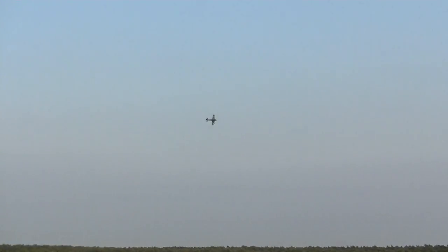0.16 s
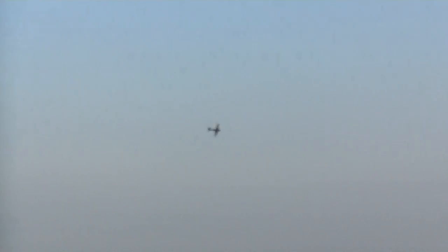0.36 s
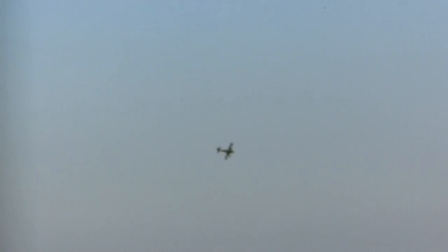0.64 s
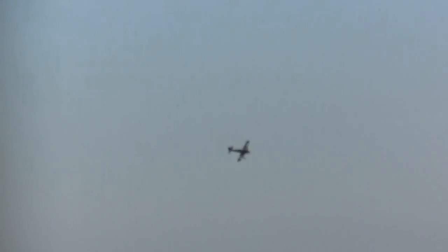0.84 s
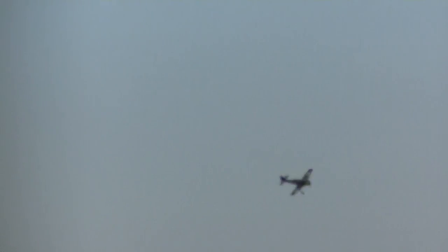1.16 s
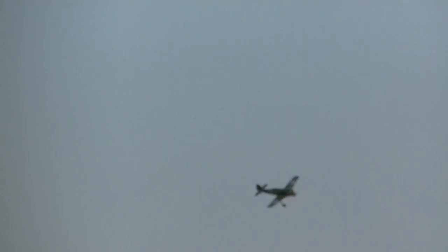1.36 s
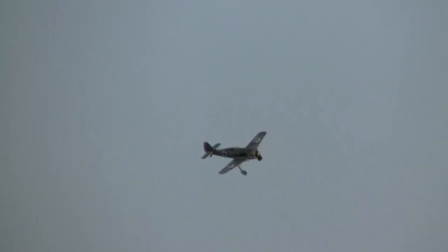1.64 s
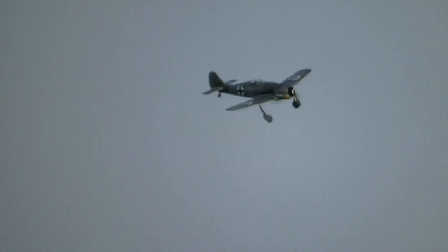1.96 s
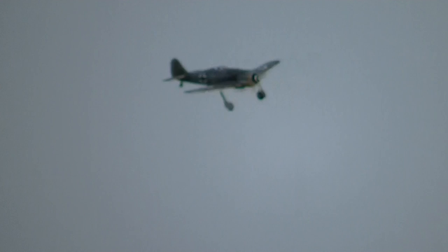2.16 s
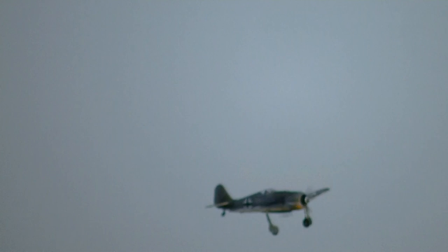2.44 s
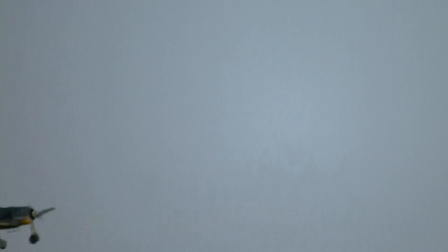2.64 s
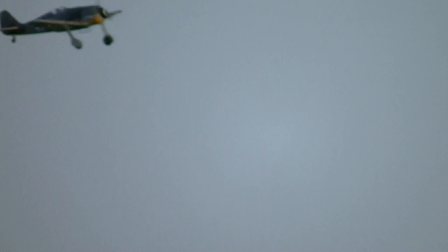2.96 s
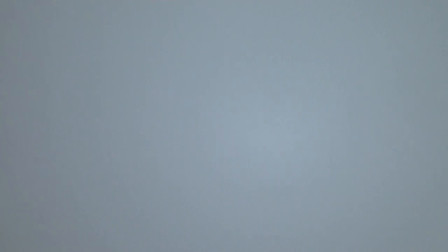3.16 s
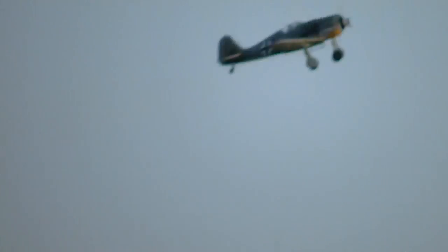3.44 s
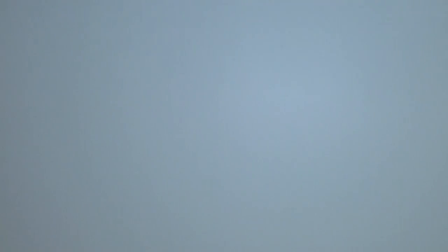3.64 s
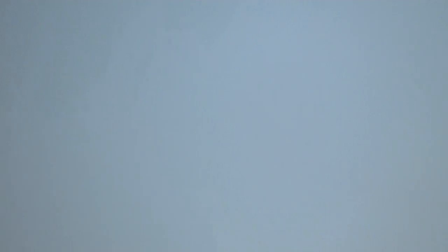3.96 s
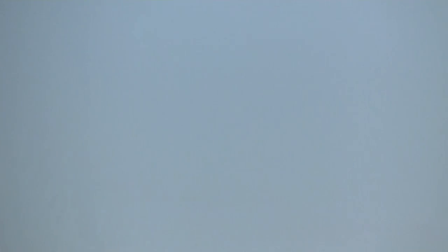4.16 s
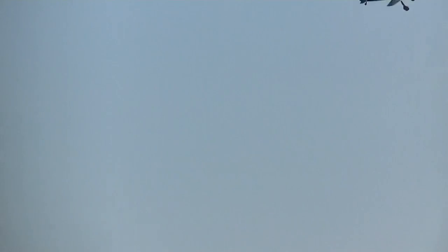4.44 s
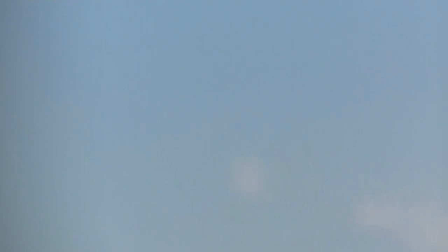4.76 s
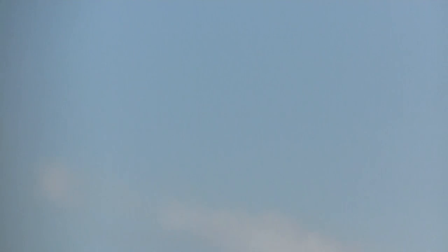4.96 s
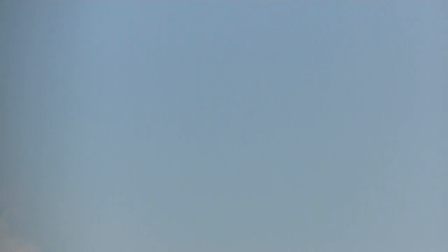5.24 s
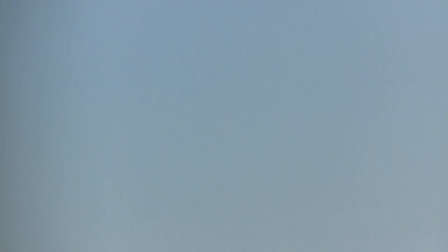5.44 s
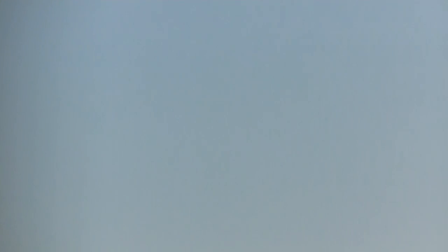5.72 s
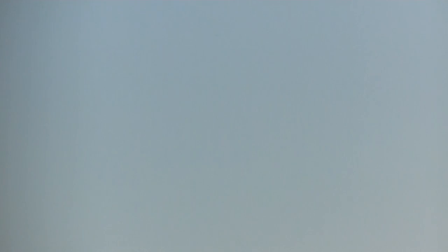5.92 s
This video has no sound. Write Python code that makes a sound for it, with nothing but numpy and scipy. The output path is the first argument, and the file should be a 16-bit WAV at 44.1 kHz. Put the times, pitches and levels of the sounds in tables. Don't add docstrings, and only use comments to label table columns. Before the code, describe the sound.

Outdoors, a steady high electric whine with buzzing propeller tones swells and fades as a model plane passes, wrapped in breathy air noise. Close to the microphone, skin scrapes the plastic case and two hard dry clicks stand out far above the distant plane. Low wind puffs bump the microphone midway and near the end, while airy howls colour the last second and the whine grows stronger.

```python
import sys
import numpy as np
from scipy import signal
from scipy.io import wavfile
from scipy.ndimage import uniform_filter1d, map_coordinates

SR = 44100
rng = np.random.default_rng(int(sys.argv[2]) if len(sys.argv) > 2 else 0)


def output_pcm(signal):
    pcm = np.clip(np.atleast_2d(signal).T, -1, 1) * 32767
    wavfile.write(sys.argv[1], SR, np.round(pcm).astype(np.int16))


def level_to_linear(level):
    exponent = np.asarray(level, float) / 20
    return 10 ** exponent


N = 268466


def evened(x):
    return x / np.sqrt(np.mean(x ** 2) + 1e-20)


def read(points, hz):
    f, value = np.transpose(points)
    return np.interp(np.log(hz + 1), np.log(f + 1), value)


def curves(rows):
    s, *columns = np.transpose(rows)
    return [np.interp(np.arange(N) / SR, s, c) for c in columns]


def swells(steady_db, rows):
    t = np.arange(0, N + 64, 64) / SR
    level = level_to_linear(steady_db)
    level = level + sum(level_to_linear(db) * np.exp(-((t - s) / half_s) ** 2) for s, half_s, db in rows)
    return np.interp(np.arange(N) / SR, t, 20 * np.log10(level))


def panned(x, pan_db):
    left, right = np.broadcast_to(x, (2, x.shape[-1]))
    return np.array([left * level_to_linear(pan_db / 2), right * level_to_linear(-pan_db / 2)])


def add(mix, s, sound):
    part = mix[:, round(s * SR):][:, :sound.shape[1]]
    part += sound[:, :part.shape[1]]


def patches(frames, bins, patchy_db):
    spots = uniform_filter1d(rng.standard_normal((frames, bins)), size=24, axis=0)
    spots = uniform_filter1d(spots, size=10, axis=1)
    return level_to_linear(patchy_db * evened(spots).T)


# time in seconds, shaft speed as heard in Hz, switching tone of the speed controller in Hz.
SPEED_HZ = [(0.0, 134.36, 7666), (0.15, 134.61, 7682), (0.3, 135.3, 7711), (0.75, 137.0, 7792),
            (1.35, 139.35, 7882), (1.65, 140.36, 7922), (2.1, 141.21, 7963), (2.4, 141.18, 7964),
            (2.7, 141.42, 7959), (3.0, 141.2, 7947), (3.6, 139.74, 7873), (4.05, 138.27, 7835),
            (4.35, 138.08, 7821), (4.65, 137.17, 7800), (4.95, 136.75, 7791), (5.4, 137.36, 7789),
            (5.7, 136.98, 7764), (6.07, 134.94, 7707)]
# time in seconds, level in dB.
PULL_DB = [
    (0, -8),
    (1.12, -9),
    (1.3, -27),
    (1.335, 2.5),
    (6.09, 2),
]
PULL_FOLLOWS = [0.085, 0.048, 0.063, 0.56, 0.24]
MAGNET_ORDERS = [13, 14, 28, 42]
BLADE_ORDERS = [2, 3, 4, 5, 12, 21, 8]
MAGNET_DB = [-74.5, -62.5, -65.5, -76]
BLADE_DB = [-80.5, -71.5, -80.5, -75, -71, -81.5, -70.5]
# middle in seconds, half length in seconds,
# level in dB.
MAGNET_BEAMS = [
    [(.08, 0.2, -55.5), (.5, 0.2, -61), (1.3, 0.47, -58.5), (3.55, 0.3, -70), (4.3, 0.48, -56.5),
     (5.33, 0.57, -47.5)],
    [(.65, 0.15, -51), (1.4, 0.39, -53), (2.15, 0.46, -55.5), (3.0, 0.26, -71), (4.0, .25, -78),
     (4.65, 0.36, -58.5), (5.36, 0.28, -49.5), (5.9, 0.51, -65)],
    [(.28, 0.078, -62), (.95, 0.077, -67), (1.27, 0.18, -54), (2.45, 0.094, -61), (3.17, 0.27, -60),
     (3.59, 0.029, -71), (3.85, 0.37, -52.5), (4.55, 0.55, -58.5), (5.55, 0.4, -64), (6.0, 0.073, -65)],
    [(.25, 0.25, -50), (.75, 0.11, -54), (.92, 0.068, -64), (1.07, 0.039, -61), (1.5, 0.52, -58.5),
     (2.1, 0.68, -57.5), (3.0, 0.35, -59.5), (3.8, 0.4, -59.5), (4.7, 0.4, -61.5), (5.42, 0.16, -60.5),
     (5.92, 0.034, -67), (6.05, 0.045, -54)],
]
BLADE_BEAMS = [
    [(.5, 0.34, -75), (1.2, 0.35, -71.5), (1.8, 0.21, -69), (3.9, 0.43, -60.5), (4.7, 0.4, -64.5),
     (5.65, 0.55, -65.5)],
    [(0, 0.2, -65), (.65, 0.52, -68.5), (2.7, 0.13, -88), (5.4, 0.21, -69)],
    [(.3, 0.54, -69.5), (3.0, 0.3, -67), (3.65, 0.29, -64), (4.4, 0.43, -67.5), (5.7, 0.11, -57)],
    [(1.1, 0.39, -72), (2.6, .25, -77), (4.1, 0.59, -74), (5.35, 0.15, -64.5)],
    [(.8, .3, -69), (2.35, .3, -66), (3.3, 0.12, -65), (3.9, 0.16, -68), (4.8, 0.39, -61.5)],
    [(.15, 0.51, -59), (1.35, 0.43, -70), (3.9, 0.77, -68.5), (5.15, 0.57, -66)],
    [(0, 0.12, -60.5), (2.15, 0.23, -75)],
]
# middle in seconds, half length in seconds, level in dB.
SWITCH_BEAMS = [(.63, 0.11, -68), (1.5, 0.21, -70), (2.4, 0.073, -81), (2.8, 0.1, -65), (3.85, 0.64, -66.5),
                (4.62, 0.076, -62), (6.07, 0.13, -69)]
# shaft order, level in dB.
FAINT_ORDERS = [(6, -127), (11, -69.5), (16, -69), (27, -94), (41, -82)]


def tone(turn, db):
    slow = N // 64 + 1
    wander = evened(uniform_filter1d(rng.standard_normal((2, slow)), size=20))
    flicker, drift = uniform_filter1d(np.repeat(wander, 64, 1)[:, :N], size=128)
    grain = np.repeat(rng.standard_normal(slow), 64)[:N]
    buzz = 1 + 0.074 * evened(uniform_filter1d(grain, size=96))
    phase = 2 * np.pi * (turn + 0.019 * drift + rng.random())
    return np.sqrt(2) * level_to_linear(db + 1.08 * flicker) * buzz * np.cos(phase)


def motor():
    shaft_hz, switch_hz = curves(SPEED_HZ)
    shaft_turns, switch_turns = np.cumsum(shaft_hz) / SR, np.cumsum(switch_hz) / SR
    pull_db = curves(PULL_DB)[0]
    out = np.zeros(N)
    for order, follow, db, beams in zip(MAGNET_ORDERS, PULL_FOLLOWS, MAGNET_DB, MAGNET_BEAMS):
        out += tone(order * shaft_turns, follow * pull_db + swells(db, beams))
    for order, db, beams in zip(BLADE_ORDERS, BLADE_DB, BLADE_BEAMS):
        out += tone(order * shaft_turns, swells(db, beams))
    for order, db in FAINT_ORDERS:
        out += tone(round(order) * shaft_turns, db)
    return out + tone(switch_turns, PULL_FOLLOWS[-1] * pull_db + swells(-68, SWITCH_BEAMS))


# body roar, wing rush, blade swish, tip hiss. Centre in Hz, level in dB,
# dB per dB of facing.
RUSH_HZ = [1100, 2800, 4800, 10500]
RUSH_DB = [-55.5, -61.5, -56.5, -61]
RUSH_FOLLOWS = [0.12, 0.36, 0.22, 1.44]
# frequency in Hz, density in dB per Hz.
AIR_DB = [(150, -37), (300, -27), (500, -8.5), (900, -2), (1600, -3), (2300, -0.5), (3200, -10.5),
          (4600, -6.5), (6500, -13.5), (8500, -16.5), (12400, -22), (15500, -32.5)]
# time in seconds, level in dB.
FACING_DB = [(0, 2), (.2, -18), (.45, -19), (.75, -15), (1.1, -17), (1.25, -10), (1.7, -3), (1.85, 1),
             (2.3, 0.5), (2.6, -0.5), (3.1, 4), (3.5, 1.5), (4.0, 3), (4.5, 1), (4.85, 2), (5.3, -6.5),
             (5.7, 1.5), (6.09, 4)]
# middle in seconds, half length in seconds, level in dB, centre in Hz.
GUSTS = [(0.083, 0.031, -51, 2300), (0.638, 0.053, -59, 3700), (1.342, 0.08, -60, 4300),
         (1.58, 0.055, -63, 4000), (1.959, 0.21, -60, 1500), (2.292, 0.11, -59.5, 10000),
         (2.447, 0.033, -57, 9200), (2.763, 0.033, -64, 4530), (2.97, 0.019, -49, 900),
         (3.122, 0.039, -63, 7040), (3.38, 0.032, -68, 6490), (3.59, 0.04, -56, 900),
         (3.696, 0.07, -60.5, 8000), (4.236, 0.089, -58, 3000), (4.575, 0.18, -59.5, 3500),
         (4.948, 0.075, -52.5, 4500), (5.27, 0.14, -52, 5150), (5.432, 0.076, -52.5, 2970),
         (5.614, 0.069, -55, 900), (5.918, 0.36, -61.5, 2940)]


def rush():
    gust_octaves = 1.4
    chops, gusts_db = [0.039, 0.097, 0.17, 0.18], [0.2, 0.5, 0.7, 1.2]
    frames, hz = N // 128 + 5, np.fft.rfftfreq(512, 1 / SR)
    a, b = rng.standard_normal((frames, 257, 2)).T
    z = (a + 1j * b) * level_to_linear(read(AIR_DB, hz))[:, None] * patches(frames, 257, patchy_db=2.0)
    blade_phase = 2 * np.pi * 2 * np.cumsum(curves(SPEED_HZ)[0]) / SR
    gust = uniform_filter1d(rng.standard_normal(N), size=1500)
    gust = evened(uniform_filter1d(gust, size=900))
    facing_db = curves(FACING_DB)[0]
    out = np.zeros(N)
    for k, (chop, gust_db) in enumerate(zip(chops, gusts_db)):
        blown = [(s, half_s, db - 6 * (np.log2(f / RUSH_HZ[k]) / gust_octaves) ** 2)
                 for s, half_s, db, f in GUSTS]
        level = level_to_linear(RUSH_DB[k] + RUSH_FOLLOWS[k] * facing_db) + level_to_linear(swells(-120, blown))
        share = read(list(zip(RUSH_HZ, np.arange(4) == k)), hz)[:, None]
        layer = evened(signal.istft(z * share, nperseg=512, noverlap=384)[1][:N])
        out += level * level_to_linear(-5.0 + gust_db * gust) * layer * (1 + chop * np.cos(blade_phase))
    return out


# time in seconds, delay in ms.
ECHO_MS = [(0.3, 1.406), (0.45, 1.442), (1.1, 1.471), (1.35, 1.419), (2.4, 1.322), (3.0, 1.44),
           (3.42, 1.61), (3.55, 1.695), (3.68, 1.79), (3.87, 1.945), (4.1, 2.15), (4.3, 2.325),
           (4.6, 2.485), (4.75, 2.58), (5.1, 2.69), (5.4, 2.735), (5.57, 2.79), (5.74, 2.73), (5.85, 2.69),
           (6.07, 2.57)]


def ground(x, share):
    late = np.arange(N) - curves(ECHO_MS)[0] * SR / 1000
    return x + share * map_coordinates(x, [late], order=3, mode="reflect")


# frequency in Hz, density in dB per Hz.
FIELD_DB = [(30, -19), (180, -9.5), (430, -3), (940, -0.5), (2000, -7.5), (4400, -9.5), (7500, -14),
            (11000, -17.5), (16000, -25.5)]
# frequency in Hz, left-right likeness from -1 to 1.
FIELD_SAME = [
    (60, 0.071),
    (150, -0.22),
    (500, 0.21),
    (2000, 0.42),
]


def field():
    frames, hz = N // 256 + 5, np.fft.rfftfreq(1024, 1 / SR)
    a, b, c, d = rng.standard_normal((frames, 513, 4)).T
    same = np.clip(read(FIELD_SAME, hz), -1, 1)[:, None]
    left = a + 1j * b
    right = same * left + np.sqrt(1 - same ** 2) * (c + 1j * d)
    z = np.array([left, right]) * level_to_linear(read(FIELD_DB, hz))[:, None] * patches(frames, 513, patchy_db=1.82)
    return level_to_linear(-53) * evened(signal.istft(z, nperseg=1024, noverlap=768)[1][:, :N])


# time in seconds, frequency in Hz, level in dB.
DRONE = [
    (0, 400.3, -69),
    (.88, 400.4, -70),
    (.92, 340, -65),
    (.99, 336, -68),
    (1.03, 338, -95),
    (6.09, 330, -95),
]


def drone():
    hz, db = curves(DRONE)
    return np.sqrt(2) * level_to_linear(db) * np.cos(2 * np.pi * (np.cumsum(hz) / SR + rng.random()))


# frequency in Hz, width in Hz, level in dB.
CASE_MODES = [(910, 156, -7), (1670, 310, -10), (2100, 320, -7.5), (2530, 490, -1), (3074, 740, -3.5),
              (4000, 660, -6), (4600, 500, -4.5), (5300, 430, -5.5), (6250, 590, -5.5), (6800, 410, -5),
              (7800, 540, -4), (9020, 600, -6), (10940, 930, -9), (14000, 1100, -1)]


def case(drive, contact_hz, octaves):
    port_lag_s = 1.8e-5
    t = np.maximum(np.arange(600) / SR - np.array([[0], [port_lag_s]]), 0)
    ring = 0
    for k, (hz, width_hz, db) in enumerate(CASE_MODES):
        woken_db = max(-6 * (np.log2(hz / contact_hz) / octaves) ** 2, -30)
        mode = np.exp(-np.pi * width_hz * t) * np.sin(2 * np.pi * hz * t)
        ring = ring + (-1) ** k * level_to_linear(db + woken_db) * mode
    small = signal.butter(3, 600, "high", fs=SR, output="sos")
    return signal.sosfilt(small, signal.fftconvolve(drive, ring, axes=-1))


# middle in seconds, level in dB, contact pitch in Hz, left-right in dB.
RUBS = [
    (0.037, -61.5, 9900, 2),
    (.088, -58, 11000, -1),
    (2.925, -54.5, 2600, -4),
    (2.935, -55, 4500, -3),
    (2.975, -45.5, 2500, -4),
    (2.97, -52, 6800, -4),
    (3.4, -62, 2500, -4),
    (.085, -57, 1200, -1),
    (.04, -60, 1100, -1),
]


def rubs():
    out, t = np.zeros((2, N)), np.arange(2600) / SR
    for s, db, contact_hz, pan_db in RUBS:
        both, side, burst = rng.standard_normal((3, len(t)))
        slips = (both + 0.29 * side * [[1], [-1]]) * level_to_linear(9.8 * burst)
        slips = slips * signal.windows.tukey(len(t), 0.7)
        rub = evened(case(slips, contact_hz, octaves=0.83))
        add(out, s - t[-1] / 2, level_to_linear(db) * panned(rub, pan_db))
    return out


# middle in seconds, left peak in dB, right peak in dB, frequency in Hz.
PUFFS = [(0.238, -50, -47.5, 170), (1.014, -49, -45, 181), (2.62, -36, -39, 219.7), (3.36, -43, -39, 201),
         (3.394, -45, -46, 200.0), (3.446, -45, -39, 224), (3.529, -21.5, -20.5, 320),
         (3.59, -29, -24, 278), (3.634, -40, -32, 264), (3.643, -38, -32, 199), (3.686, -44, -36.5, 260.0),
         (3.806, -46, -49, 230.0), (3.873, -37, -32, 229), (3.906, -38, -41, 250.0), (3.922, -43, -45, 282),
         (3.94, -45, -40, 207), (3.957, -44, -48, 228), (3.987, -42, -43, 219), (4.28, -35, -33, 200),
         (4.292, -38, -31.5, 287), (4.343, -50, -41, 196), (4.365, -60, -44, 270.0),
         (4.464, -52, -37, 340.0), (5.713, -29.5, -32, 340), (5.727, -32, -29.5, 262),
         (5.736, -37, -30, 200), (5.808, -38, -54, 238), (5.891, -36, -31.5, 288), (5.917, -44, -31.5, 335),
         (6.078, -38, -40, 243)]


def wind():
    out, t = np.zeros((2, N)), np.arange(-600, 600) / SR
    for s, left_db, right_db, hz in PUFFS:
        phase, skew, long = rng.random(3)
        lean = np.array([[0], [np.pi - 0.5 - 0.39 * skew]])
        bell = np.exp(-(t * hz / (0.3 + 0.37 * long)) ** 2)
        wobble = np.cos(2 * np.pi * (hz * t + phase) + lean) * bell
        add(out, s + t[0], level_to_linear([[left_db], [right_db]]) * wobble)
    power = uniform_filter1d((out ** 2).mean(0), size=1500, origin=400)
    gusty = abs(uniform_filter1d(power, size=1500)) ** 0.25
    low = signal.butter(2, [95, 210], "band", fs=SR, output="sos")
    rumble = evened(signal.sosfilt(low, rng.standard_normal(N)))
    return out + level_to_linear(-30.0) * gusty * rumble * [[0.7], [-1]]


# start in seconds, level in dB, contact pitch in Hz, rattle t60 in seconds, left-right in dB.
SNAPS = [(1.9479, -16.5, 2400, 0.0074, -4), (1.9496, -13.5, 2630, .006, -5), (1.9498, -25.5, 850, .006, -6),
         (1.9502, -5, 7800, 0.0045, -3), (1.9503, -20, 14000, .01, -3), (1.9518, -16, 14000, .012, -8),
         (1.9505, -2, 4530, .008, -3), (1.9512, -15, 7000, 0.013, 1), (1.9506, -11.5, 2980, .008, -5),
         (1.9529, -16, 3000, 0.019, -4), (1.956, -25, 2700, .04, -7), (3.5615, -17, 2270, 0.005, 0.5),
         (3.5616, -21, 4900, .012, 0), (3.5608, -35, 900, 0.011, -4), (3.5627, -20, 3720, 0.0092, 2),
         (3.5653, -29, 2500, .03, -11), (3.6061, -33.5, 1500, .015, -2), (4.4586, -22, 5200, .015, -3),
         (4.4587, -29, 2100, 0.038, 0), (4.4715, -31, 6800, .015, 0), (4.4743, -2, 2550, 0.0053, -0.5),
         (4.4752, -14.5, 13500, 0.015, 1), (4.4750, -9.5, 5300, .008, -5), (4.4746, -32, 1000, 0.012, 2),
         (4.4763, -8.5, 2580, .008, -2), (4.4768, -19.5, 6800, 0.0088, 5), (4.4771, -10, 2730, 0.018, -8),
         (4.4775, -13.5, 9500, .008, -6), (4.4804, -14.5, 3900, 0.014, -4), (4.481, -22, 2600, .035, -4),
         (4.4958, -28, 1900, 0.0087, -3), (4.4974, -22, 2100, .01, -5), (4.4991, -37, 2600, 0.009, -1),
         (4.5, -38, 2200, .01, -4), (1.9508, -8.5, 8600, 0.0068, -1), (4.4771, -24, 9400, .006, -8)]


def snaps():
    out, t = np.zeros((2, N)), np.arange(2600) / SR
    for s, db, contact_hz, t60_s, pan_db in SNAPS:
        both, side = rng.standard_normal((2, len(t)))
        rattle = 0.094 * (both + 0.11 * side * [[1], [-1]]) * level_to_linear(-60 * t / t60_s)
        rattle[:, 0] = 1
        snap = case(rattle, contact_hz, octaves=0.72)
        add(out, s, level_to_linear(db) * panned(snap / abs(snap).max(), pan_db))
    return out


# middle in seconds, level in dB, pitch in Hz.
HOWLS = [(2.6, -80, 2000), (7.4, -53, 3400), (5.24, -51.5, 3600), (5.28, -51.5, 3330), (5.6, -61.5, 5700),
         (5.84, -55, 3190), (6.0, -50.5, 3250), (3.7, -57, 4300), (5.9, -60, 2870), (5.99, -58.5, 5300),
         (5.97, -54.5, 2440)]


def howls():
    out, t = np.zeros((1, N)), np.arange(7000) / SR
    for s, db, hz in HOWLS:
        hollow = signal.butter(2, [hz - 110, hz + 110], "band", fs=SR, output="sos")
        air = evened(signal.sosfilt(hollow, rng.standard_normal(len(t))))
        add(out, s - t[-1] / 2, level_to_linear(db) * air[None] * np.hanning(len(t)))
    return out[0]


# time in seconds, share.
GROUND_SHARE = [
    (0, 0.24),
    (3.2, 0.24),
    (3.5, 0.61),
    (4.3, 0.92),
    (6.09, 0.73),
]
# time in seconds, left-right in dB.
PLANE_PAN_DB = [
    (0, -1),
    (4.2, -2),
    (6.09, -1.5),
]


def scene():
    tones = ground(motor(), curves(GROUND_SHARE)[0])
    air = ground(rush() + howls(), 0.54)
    plane = panned(tones + air, curves(PLANE_PAN_DB)[0])
    return plane + field() + drone() + rubs() + wind() + snaps()


def low_pass(x):
    return signal.sosfilt(signal.butter(12, 16830, fs=SR, output="sos"), x)


def record(dry):
    bass_cut = signal.butter(3, 130, "high", fs=SR, output="sos")
    hum_low = signal.butter(1, 150, fs=SR, output="sos")
    hum = signal.sosfilt(hum_low, rng.standard_normal(N))
    mix = signal.sosfilt(bass_cut, dry) + level_to_linear(-53.5) * hum * [[1], [-0.5]]
    edge = signal.firwin(255, 16000, window=("kaiser", 8), fs=SR)
    mix = signal.oaconvolve(np.clip(mix, -1, 1), edge[None], "same")
    return low_pass(mix)


dry = scene()
out = record(dry)
output_pcm(out)
```